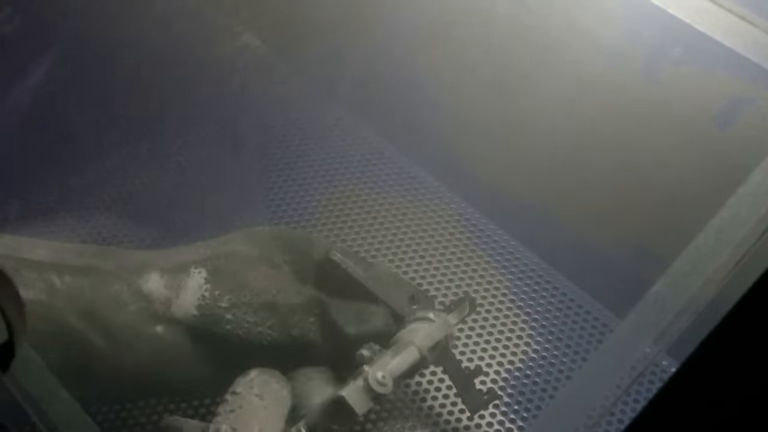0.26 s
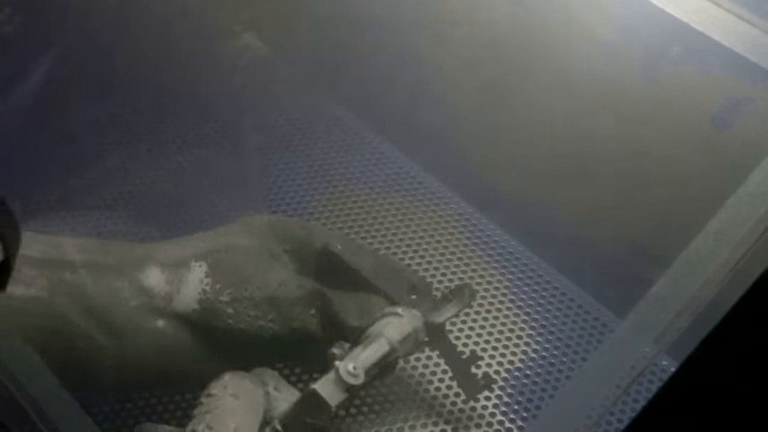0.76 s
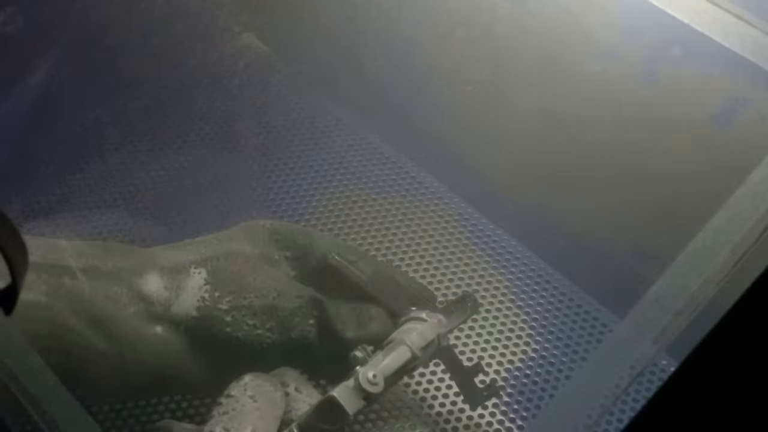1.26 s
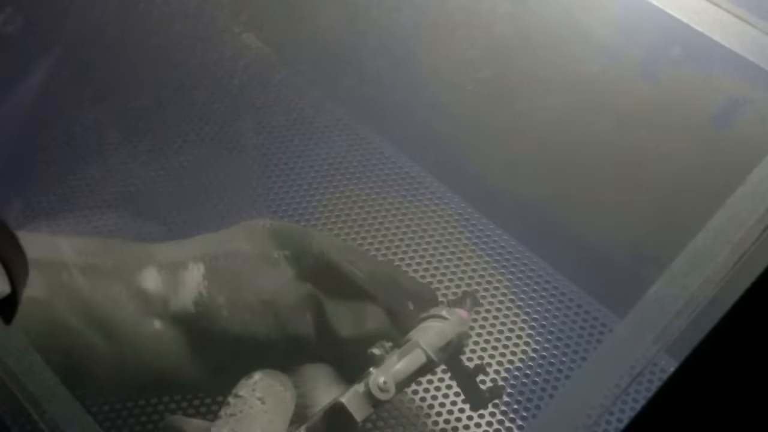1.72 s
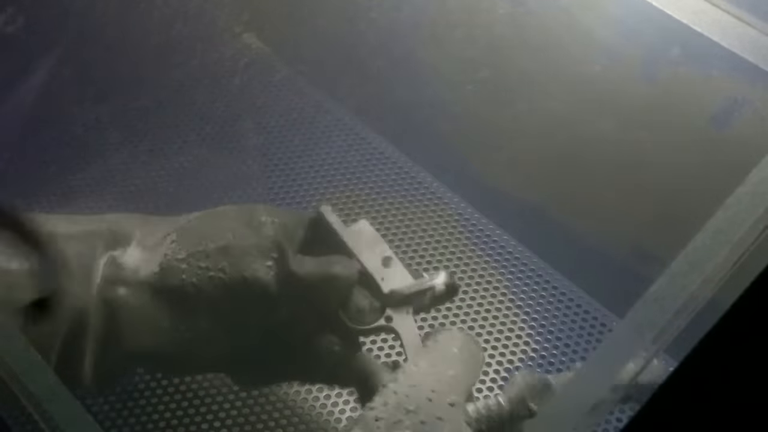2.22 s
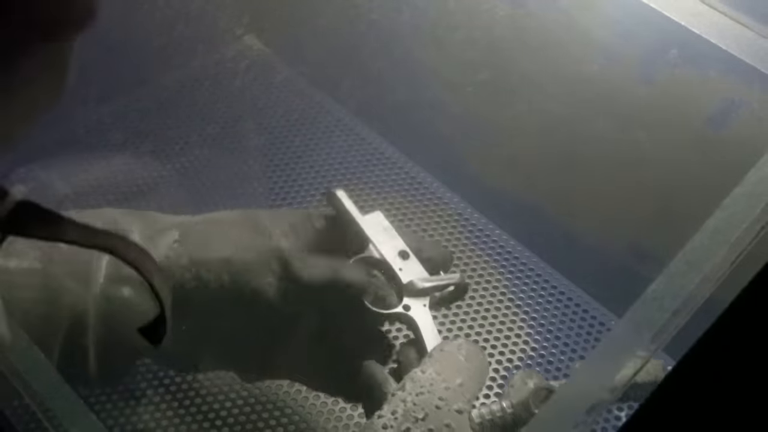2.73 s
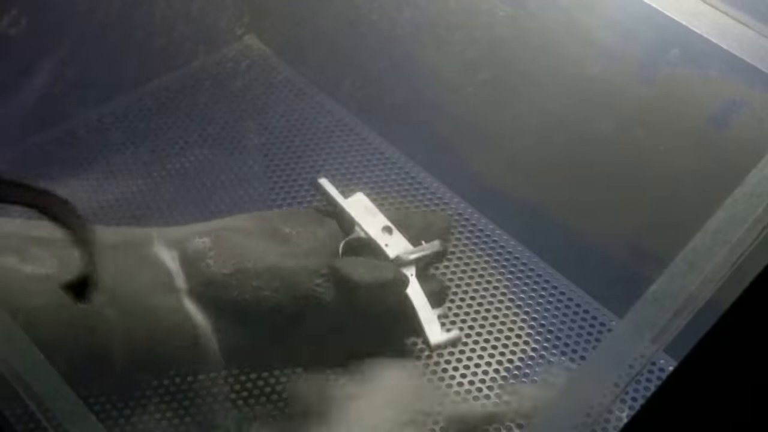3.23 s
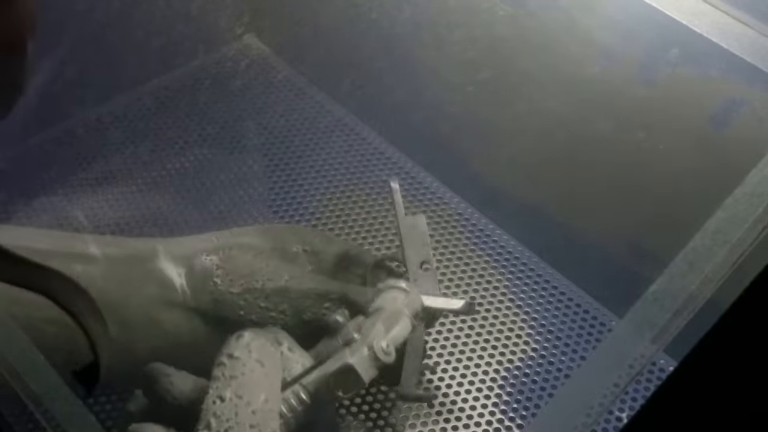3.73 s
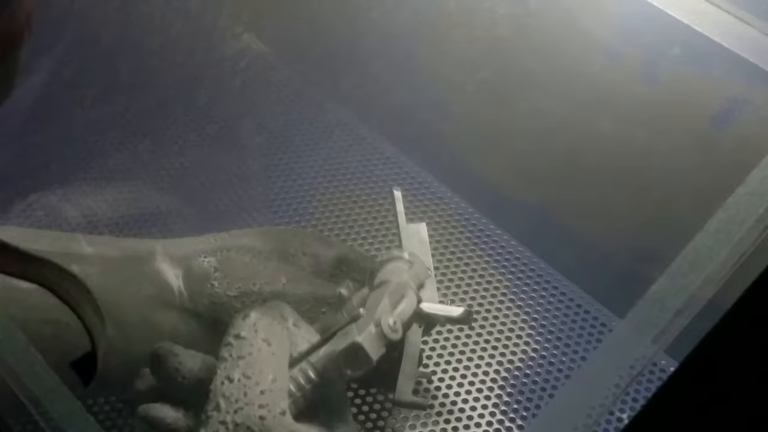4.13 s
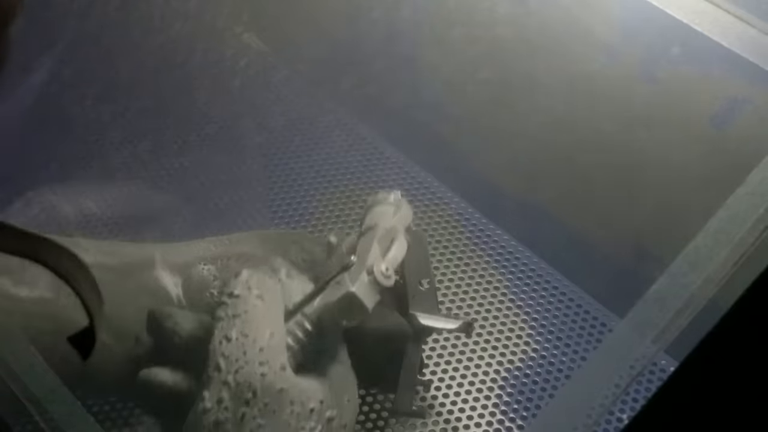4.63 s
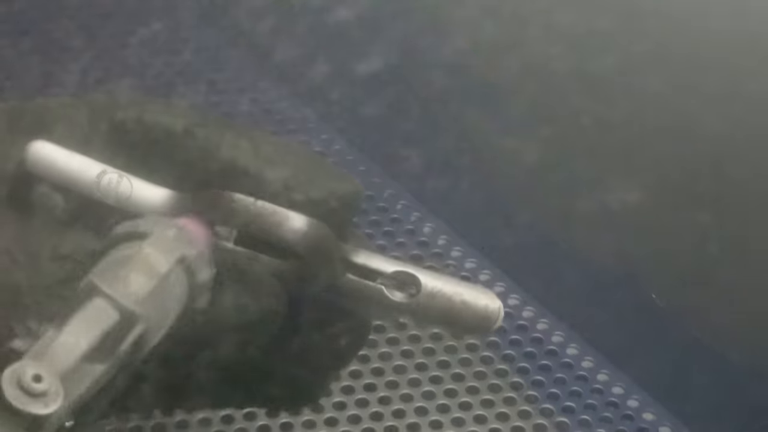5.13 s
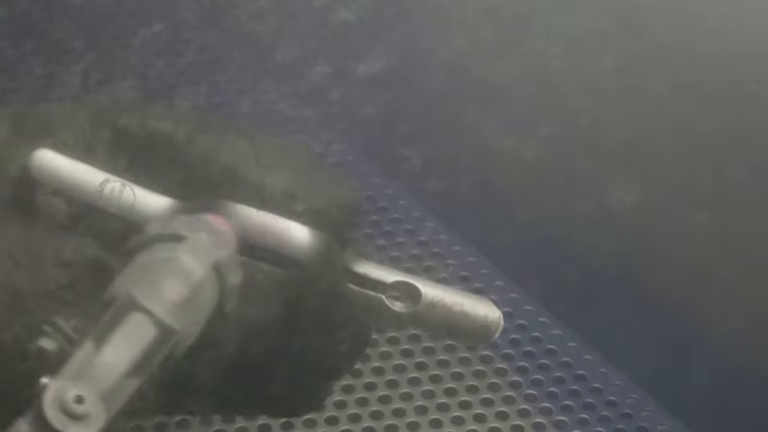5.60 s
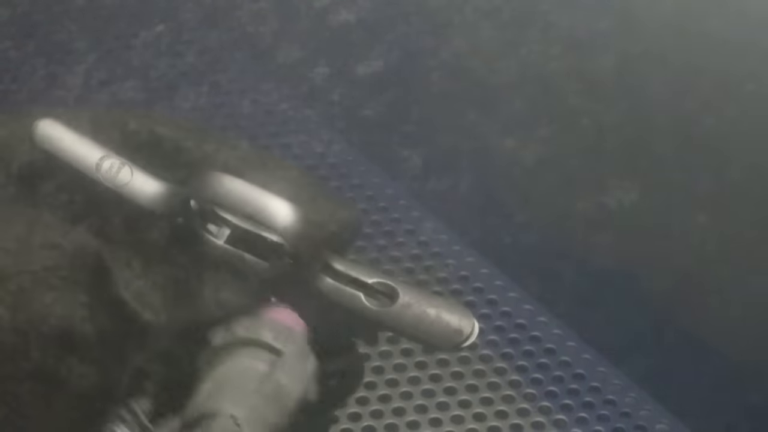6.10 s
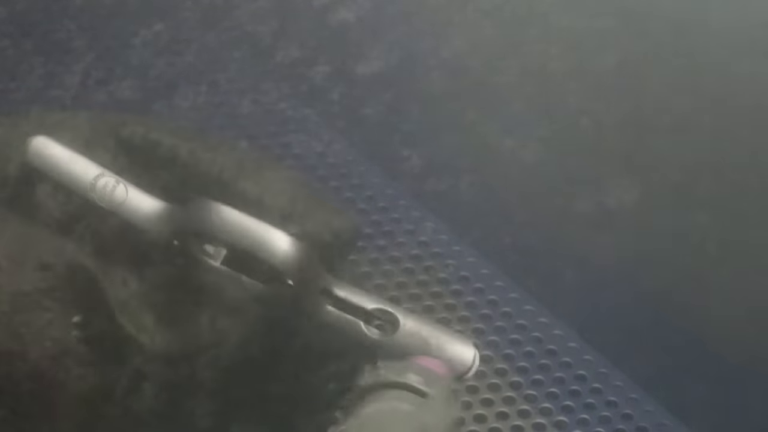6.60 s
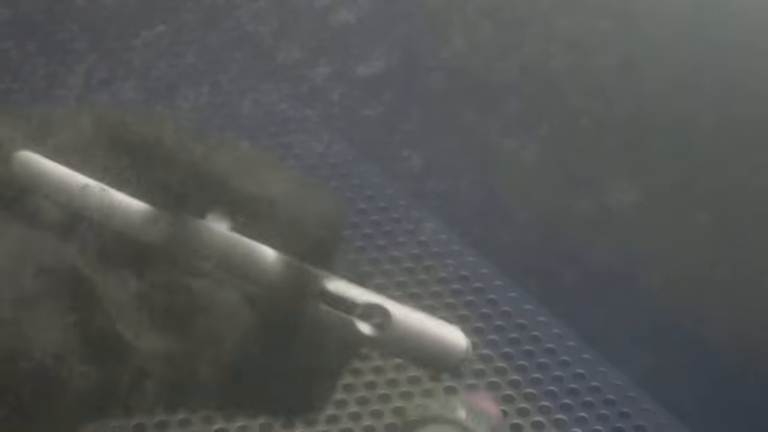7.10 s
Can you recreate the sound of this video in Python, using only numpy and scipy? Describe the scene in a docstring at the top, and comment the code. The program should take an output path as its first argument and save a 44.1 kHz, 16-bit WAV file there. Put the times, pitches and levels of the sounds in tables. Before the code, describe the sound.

A compressed-air blast gun sprays fine grit onto a small steel part inside a closed cabinet, heard close by. The dense, steady hiss makes the box and the metal ring, and faint breathy whistles come and go as the jet catches edges and holes. A dust extractor motor whines behind it. About five seconds in, the sound switches abruptly to a second part, slightly louder, with the ringing and the motor higher in pitch.

```python
"""A compressed-air blast gun sprays fine grit onto small steel parts in a closed cabinet, heard close by. The
hiss of air and grit makes the box and the steel ring, and the jet whistles when it catches an edge or a hole.
Behind it whines the dust extractor's motor. At 5 s the scene cuts to a second stretch, where everything runs
faster, so the ringing and the motor sit a fourth (about 4/3) higher in pitch."""
import sys
import numpy as np
from scipy.fft import rfft, irfft
from scipy.io import wavfile
from scipy.ndimage import uniform_filter1d

SR = 44100
rng = np.random.default_rng(int(sys.argv[2]) if len(sys.argv) > 2 else 0)


def output_pcm(signal):
    """Save a mono or channel-first signal as 16-bit PCM at the path in sys.argv[1].

    Samples are clipped to [-1, 1] before scaling.
    """
    pcm = np.clip(np.atleast_2d(signal).T, -1, 1) * 32767
    wavfile.write(sys.argv[1], SR, np.round(pcm).astype(np.int16))


N = 324135
TIME = np.arange(N) / SR
FREQ = np.maximum(np.fft.rfftfreq(N, 1 / SR), 1)
LEFT_RIGHT = np.array([[1], [-1]])  # adds on the left, subtracts on the right
TOP_HZ = 15750


def amp(db):
    """Turn decibels into a factor to multiply by."""
    return 10 ** (np.asarray(db) / 20)


def unit(x):
    """Scale a signal to an average power of 1."""
    return x / np.sqrt(np.mean(x ** 2))


def colour(points, column=1, speed=1):
    """A gain for every frequency, drawn through (f/Hz, level/dB) points; speed shifts them up in pitch."""
    points = np.asarray(points, float)
    return amp(np.interp(np.log(FREQ), np.log(points[:, 0] * speed), points[:, column]))


def resonance(hz, width_hz):
    """A steep filter that lets through a band around one pitch, as a ringing object does."""
    return 1 / (1 + 1j * (FREQ ** 2 - hz ** 2) / (FREQ * width_hz)) ** 2


def wander(steps_per_s):
    """A smooth random wobble with a typical size of 1."""
    hold = int(SR / steps_per_s)
    steps = np.repeat(rng.standard_normal(N // hold + 1), hold)
    return unit(uniform_filter1d(uniform_filter1d(steps, hold), hold)[:N])


def extractor(speed, shaft_db, blade_db, shaft_pan_db=0, blade_pan_db=0):
    """The motor's steady shaft tone and its fan's wavering whine; standing waves make one side louder."""
    shaft_hz, blade_count = 897.2 * speed, 7
    phase = 2 * np.pi * np.cumsum(shaft_hz * (1 + 0.000288 * wander(5))) / SR
    shaft_gain = amp(shaft_db + 0.5 * wander(14) + LEFT_RIGHT * shaft_pan_db / 2)
    blade_gain = amp(blade_db + 2.0 * wander(18) + LEFT_RIGHT * blade_pan_db / 2)
    return np.sqrt(2) * (shaft_gain * np.sin(phase) + blade_gain * np.sin(blade_count * phase))


def wall_echoes(speed, echo_db=-7.5, treble_hz=2500):
    """A filter: crowded echoes between the sheet walls put many peaks and dips in the treble."""
    decay_s = 0.17 / speed  # time to fade by 60 dB
    tail = rng.standard_normal(N) * np.exp(-np.log(1000) * TIME / decay_s)
    echoes = rfft(tail / np.sqrt(np.sum(tail ** 2)))
    return 1 + amp(echo_db) * echoes * FREQ ** 2 / (FREQ ** 2 + treble_hz ** 2)


def ringing(part, speed):
    """A filter: swirling air drives each resonance of box and steel at its own spot, so their powers add."""
    # Resonances of the cabinet's air and walls, at speed 1:
    # f/Hz, width/Hz, level over the jet on the first part/dB, on the second/dB
    cabinet = [(388.8, 41, 11.5, 12), (424.2, 26, 14.5, 15.5), (464.4, 30, 8.5, 9.5), (530, 32, 8.5, 9.5),
               (618, 55, 4, 6.5), (667, 27, 6.5, 8), (781, 176, 6.5, 10.5), (830, 57, 10.5, 15.5),
               (1052, 30, 11, 8), (1080, 197, 9, 18), (1220, 68, 7, 8), (1375, 126, 7.5, 12),
               (1471, 14, 6.5, 13.5), (1743, 58, 7, 6.5), (1786, 25, -3, 11), (1860, 50, 5.5, 7),
               (1923, 21, 9.5, 9), (1982, 160, 5.5, 11), (2021, 47, 12.5, 17.5), (2154, 194, 5, 10.5),
               (2416, 69, 0.5, 10.5), (2520, 47, 4, 13.5), (2595, 53, 5.5, 11.5), (2641, 115, -9, 14),
               (2690, 22, -1, 15.5), (2780, 90, 6.5, 5), (2963, 226, 8, 10), (3006, 31, 6.5, 13),
               (3120, 131, 1, 10), (3216, 57, -5, 8.5)]
    # Resonances of the steel, grate and nozzle, with the same columns
    steel = [(3350, 49, 10, 12), (3452, 71, 10, 17), (3553, 98, -12, 17), (3560, 24, 5, -12),
             (3860, 730, 6, 10), (4070, 63, 8.5, 9), (4330, 28, 9, 12), (4565, 370, 6, 5.5),
             (4660, 23, 11, 12), (4765, 40, 10.5, 7), (4820, 94, 6.5, 12), (4970, 106, 8.5, 8),
             (5070, 84, 10.5, 6), (5300, 290, 4.5, 6), (5560, 24, -3, 12), (5796, 560, 7.5, 4),
             (5960, 64, 7, 4), (6285, 160, 5, 8), (6630, 137, 4.5, 2), (6830, 292, 0, 2), (7200, 71, 1, -2),
             (7380, 550, -1, -2.5), (8130, 135, 6.5, -6), (8400, 258, 1.5, -2), (8980, 104, -3, 4),
             (9440, 930, 4, -3), (9850, 180, 8.5, -10), (10100, 590, -3, 6.5), (11300, 142, -3, 2),
             (14700, 334, -1, -1)]
    power = sum(np.abs(amp(db[part]) * resonance(hz * speed, width_hz * speed)) ** 2
                for hz, width_hz, *db in np.vstack([cabinet, steel]))
    return np.sqrt(1 + power)


def whistles(fade_s=0.04):
    """Breathy tones: swirling air sounds in one narrow band while the jet stays on an edge or a hole."""
    # The jet catches an edge or a hole: start/s, end/s, f/Hz, width/Hz, level/dB
    catches = [(1.03, 1.66, 6260, 100, -57), (1.05, 1.23, 10500, 1100, -53), (1.09, 1.28, 13700, 450, -60),
               (2.1, 4.99, 8210, 110, -60.5), (2.54, 2.68, 8190, 130, -58), (2.85, 3.02, 3470, 45, -61),
               (3.76, 3.90, 2570, 40, -56), (3.76, 4.44, 3452, 45, -58.5), (4.76, 4.99, 2580, 40, -56),
               (5.02, 5.42, 4710, 80, -56.5), (6.05, 6.22, 11800, 200, -56), (7.094, 7.303, 2727, 45, -55)]
    out = np.zeros(N)
    for start, end, hz, width_hz, db in catches:
        tone = irfft(rfft(rng.standard_normal(N)) * resonance(hz, width_hz), N)
        fade = np.clip(np.minimum(TIME - start, end - TIME) / fade_s + 0.5, 0, 1)
        out += unit(tone) * amp(db) * fade
    return out


def aim(rise_s=0.044, fall_s=0.2):
    """Extra hiss in dB: it comes quickly as the jet finds the steel and goes slowly as it slides off."""
    # The spray meets the steel squarely: start/s, end/s, extra level/dB
    passes = [(0.0, 0.25, 0.5), (0.70, 0.79, 0.9), (1.03, 1.70, 0.8), (3.35, 4.85, 0.95), (3.72, 4.55, 0.7),
              (6.02, 6.22, 0.9), (6.33, 6.92, 0.3)]
    return sum(db * np.clip(np.minimum((TIME - start) / rise_s, 1 - (TIME - end) / fall_s), 0, 1)
               for start, end, db in passes)


def air_and_grit(grains_per_s=16000, grit_db=-7, spread_db=1.5):
    """The spectrum of rushing air plus a dense rain of grit hits of uneven strength."""
    air = rng.standard_normal(N)
    hits = rng.random(N) < grains_per_s / SR
    grit = unit(hits * rng.standard_normal(N) * amp(spread_db * rng.standard_normal(N)))
    return rfft(air + amp(grit_db) * grit)


def blast_gun(part, start_s, speed, roar_db, rise_db_per_s, spray_db, split_hz=5500):
    """The jet on one stretch (0 or 1) rings the box and the steel; its spray flutters as the feed varies."""
    # The jet's tone colour: f/Hz at speed 1, relative level on the first part/dB, on the second/dB
    jet = [(40, -43.7, -36), (80, -36.5, -35.5), (149, -23, -21), (250, -11.5, -10), (339, 0.45, 0.3),
           (617, -7.5, -7), (1030, -3, -10.5), (1610, -3, -2), (2580, 1.04, -5), (4280, -6.5, -8),
           (6960, -2.0, -1.5), (10000, -3, -2), (12500, -1, -2.5), (15600, -4, -3.2)]
    # Scattered sound, which differs between left and right:
    # f/Hz at speed 1, level relative to the common sound on the first part/dB, on the second/dB
    scatter = [(60, -10.6, -11.1), (150, -36.2, -39.5), (300, -30, -33), (400, -41, -51),
               (700, -15.2, -16.5), (1050, -26, -42), (1550, -24, -31), (2100, -13.5, -15.5),
               (2600, -22, -23), (3000, -23, -11.5), (3400, -16, -29), (4260, -22, -18.5),
               (5800, -13.5, -12.5), (9000, -11.5, -11.5), (15000, -11, -6)]
    common = wall_echoes(speed) * air_and_grit()  # standing waves, alike on both sides
    scattered = colour(scatter, part + 1, speed) * wall_echoes(speed) * air_and_grit()
    shape = colour(jet, part + 1, speed) * ringing(part, speed) * (FREQ < TOP_HZ)
    spectrum = shape * (common + LEFT_RIGHT * scattered)
    # The low roar drifts and surges slightly; the high spray follows the aim.
    low_share = 1 / (1 + (FREQ / split_hz) ** 24)
    roar = unit(irfft(spectrum * low_share, N))
    spray = unit(irfft(spectrum * (1 - low_share), N))
    roar_gain = amp(roar_db + rise_db_per_s * (TIME - start_s) + 0.24 * wander(12))
    spray_gain = amp(spray_db + aim() + 0.3 * wander(22.06))
    return roar * roar_gain + spray * spray_gain


def scene(cut_s=5.001, crossfade_s=0.012, faster=1.3243):
    """Two stretches of blasting, the second running faster, joined by a very quick crossfade."""
    first = blast_gun(part=0, start_s=0, speed=1, roar_db=-46, rise_db_per_s=0.34, spray_db=-46)
    first += extractor(speed=1, shaft_db=-62.5, blade_db=-64, shaft_pan_db=4.6)
    second = blast_gun(part=1, start_s=cut_s, speed=faster, roar_db=-43, rise_db_per_s=-0.03, spray_db=-44)
    second += extractor(speed=faster, shaft_db=-54, blade_db=-55, blade_pan_db=5)
    progress = np.clip((TIME - cut_s) / crossfade_s + 0.5, 0, 1)
    angle = np.pi / 2 * np.sin(np.pi / 2 * progress) ** 2
    return first * np.cos(angle) + second * np.sin(angle) + whistles()


def record(dry):
    """The right side sounds a little brighter, and the highest treble is cut off steeply."""
    # Balance between the two sides: f/Hz, left minus right level/dB
    balance = [(400, 0), (700, .8), (1300, 0), (4400, 0), (8100, -.6), (14000, -2.1)]
    spectrum = rfft(dry) * colour(balance) ** (LEFT_RIGHT / 2)
    low_pass = np.clip((TOP_HZ - FREQ) / 80 + 1, 0, 1)
    return irfft(spectrum * low_pass, N)


dry = scene()
out = record(dry)
output_pcm(out)
```